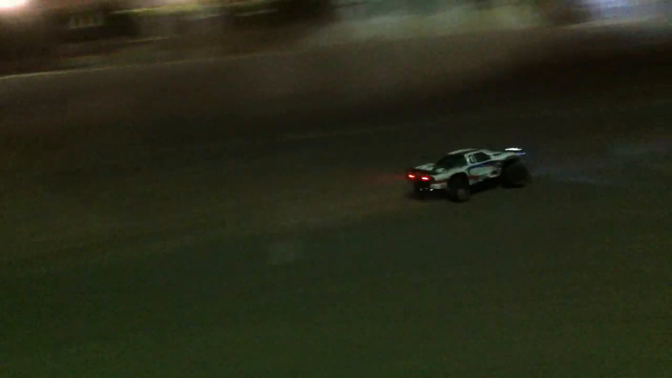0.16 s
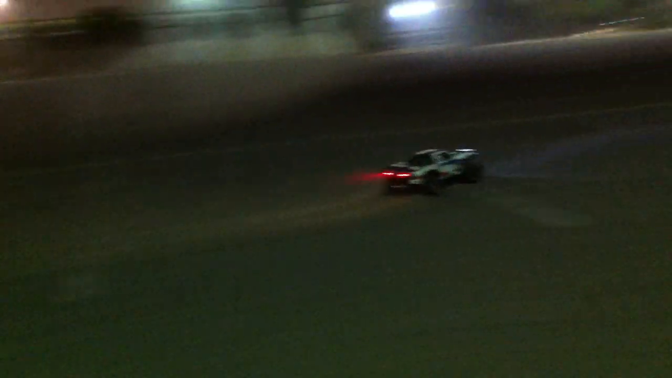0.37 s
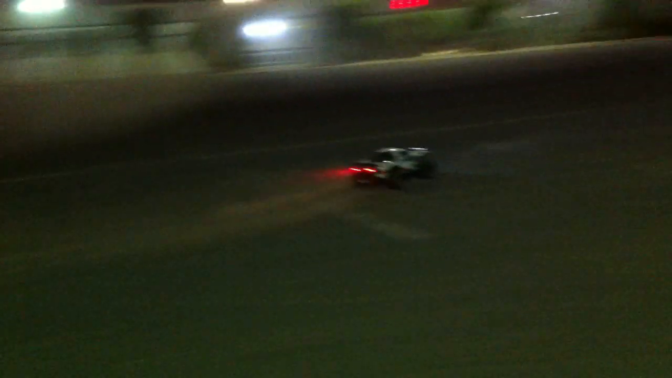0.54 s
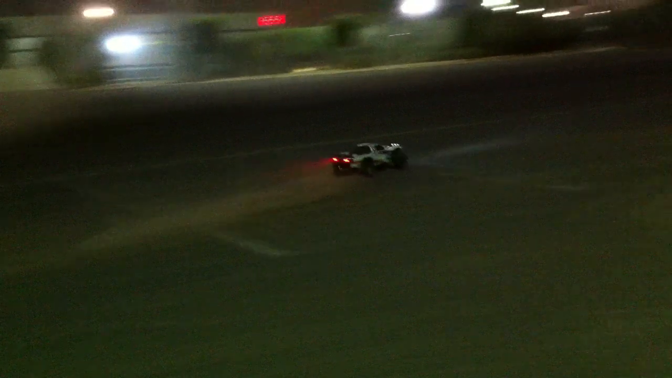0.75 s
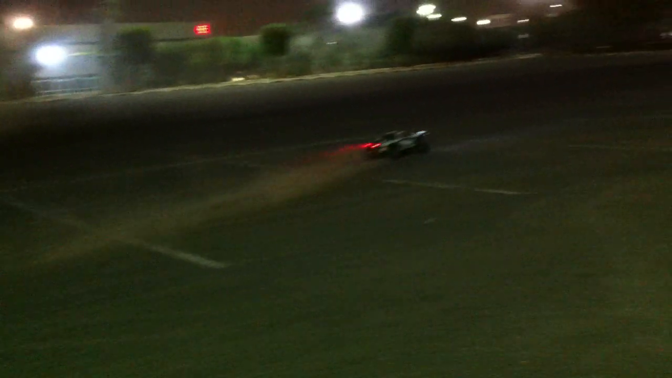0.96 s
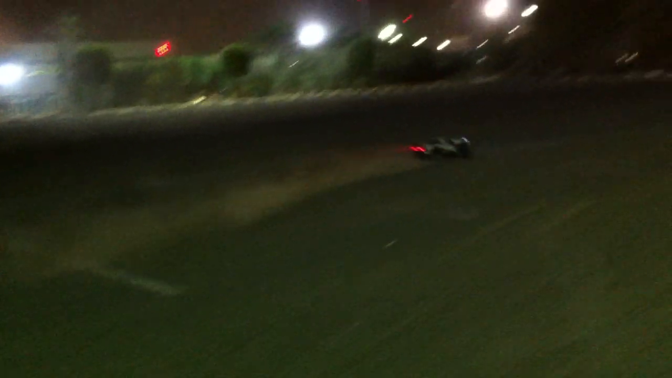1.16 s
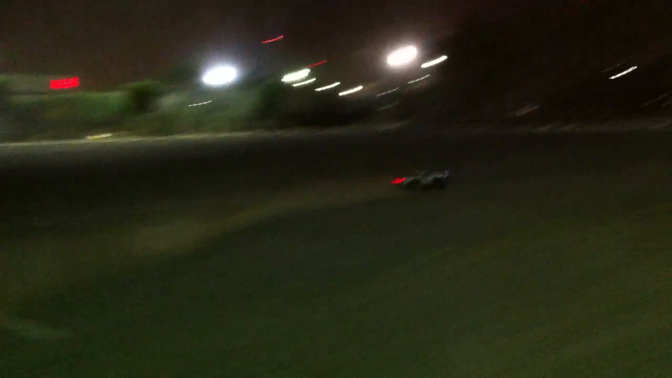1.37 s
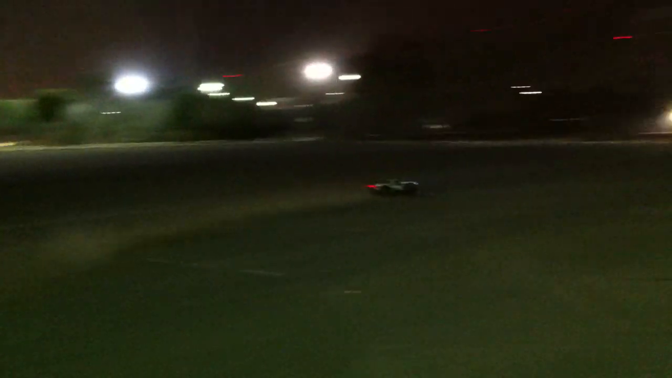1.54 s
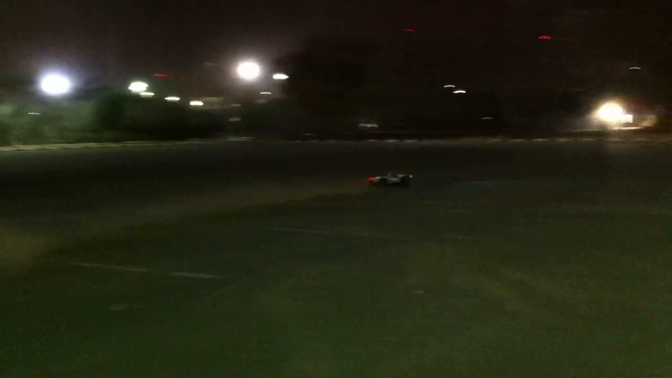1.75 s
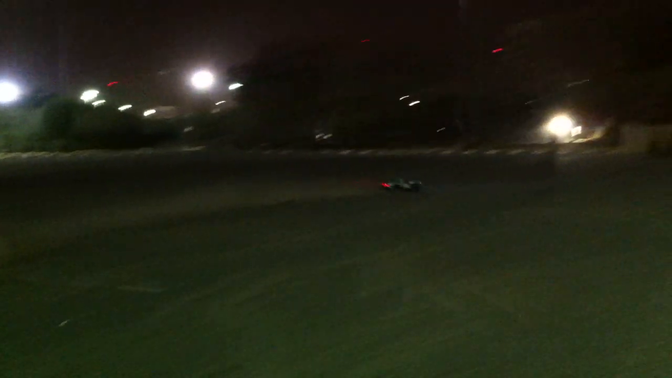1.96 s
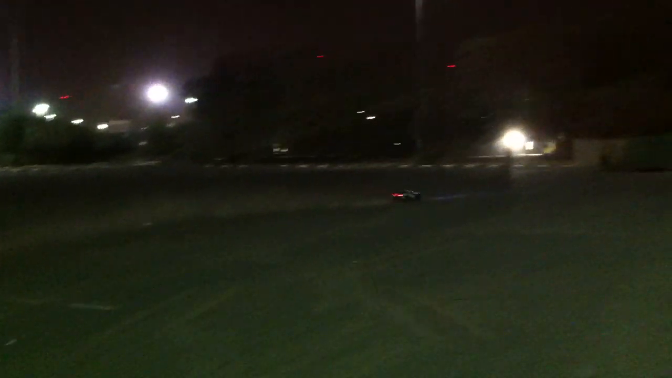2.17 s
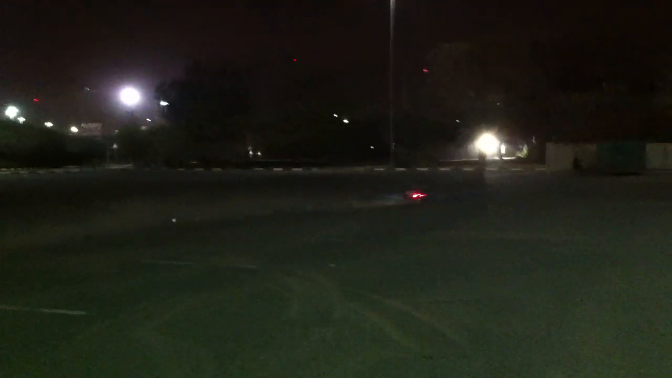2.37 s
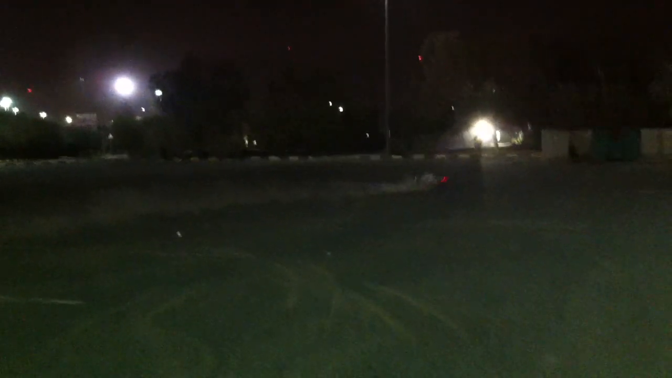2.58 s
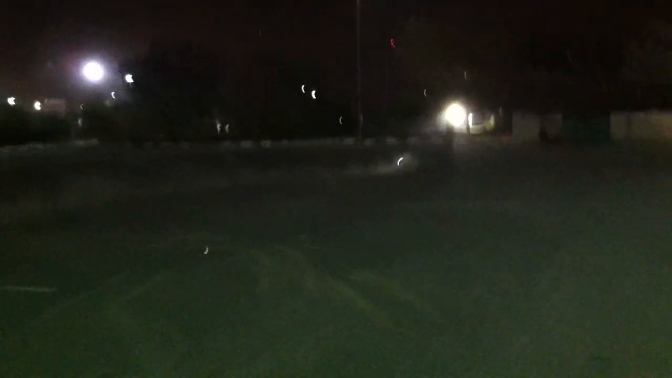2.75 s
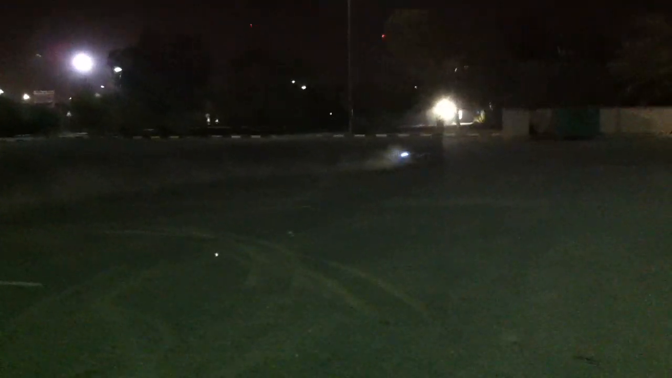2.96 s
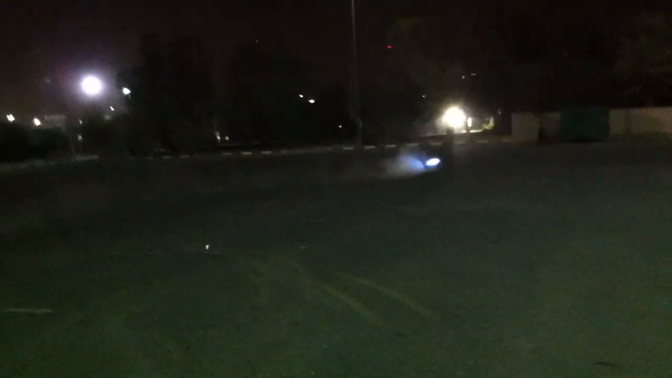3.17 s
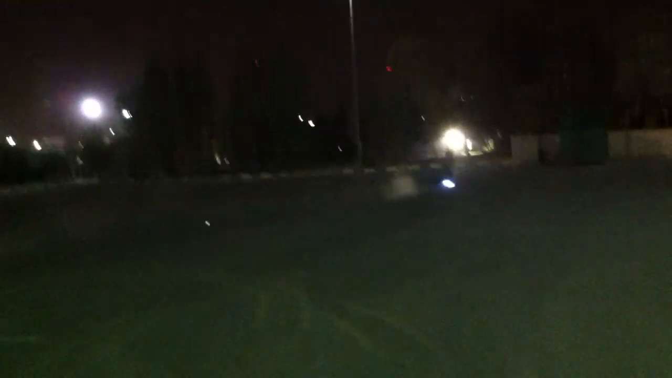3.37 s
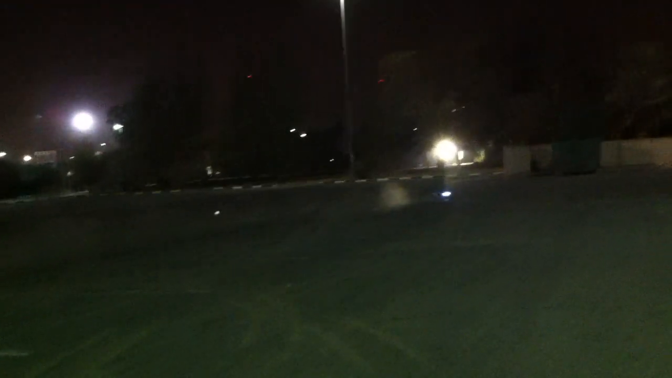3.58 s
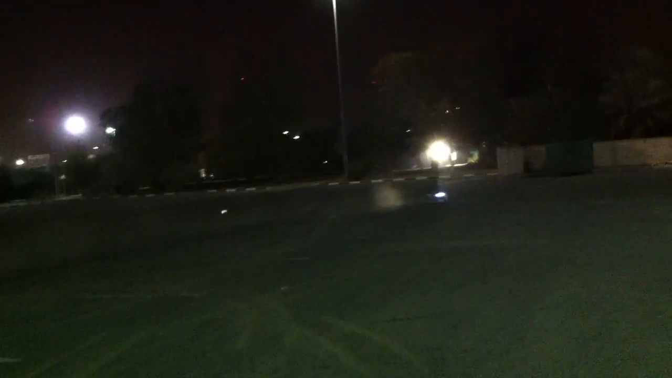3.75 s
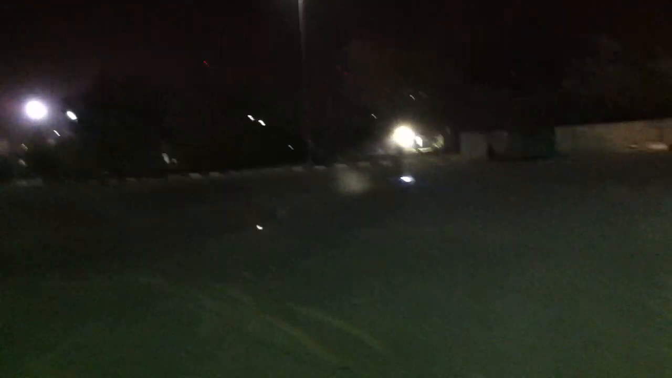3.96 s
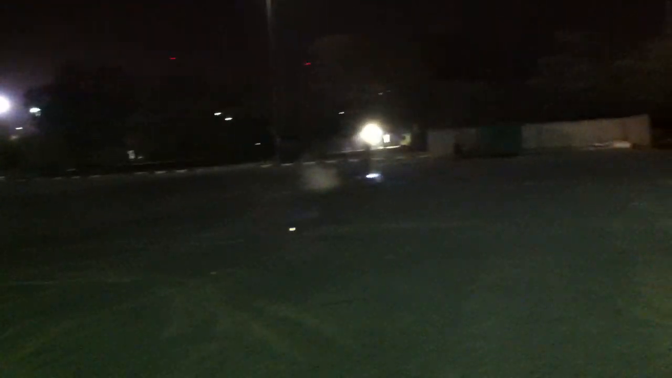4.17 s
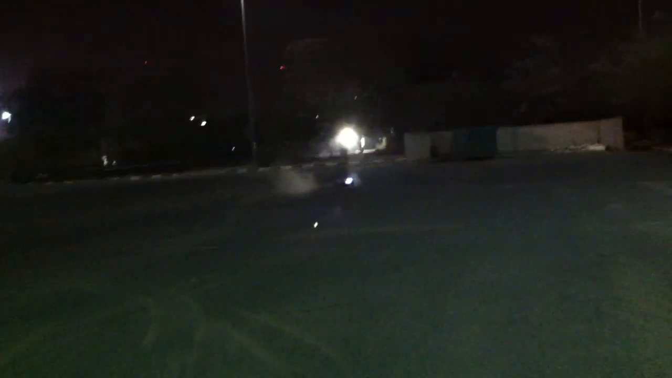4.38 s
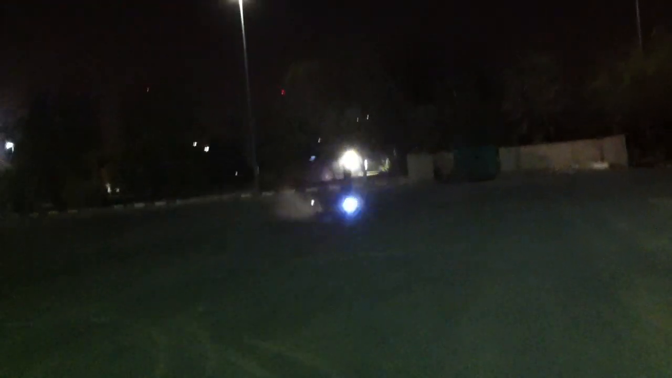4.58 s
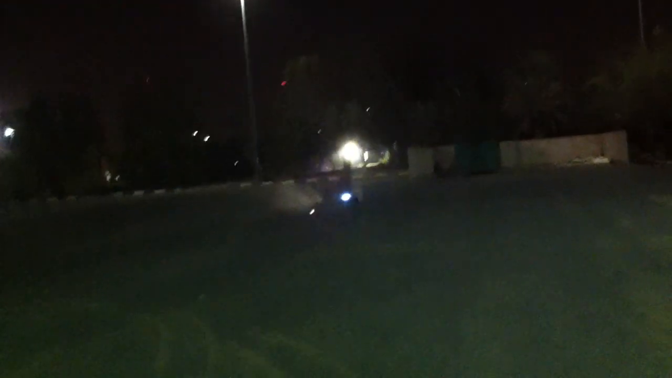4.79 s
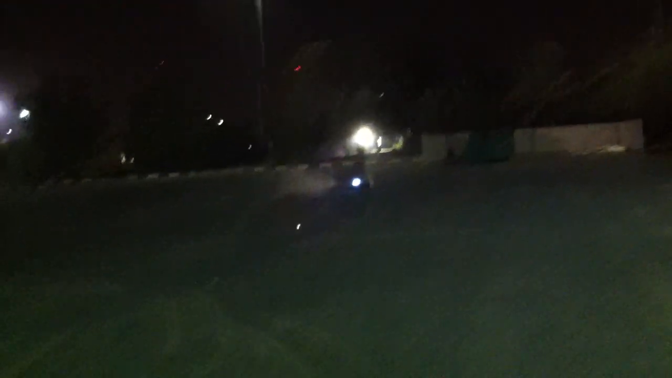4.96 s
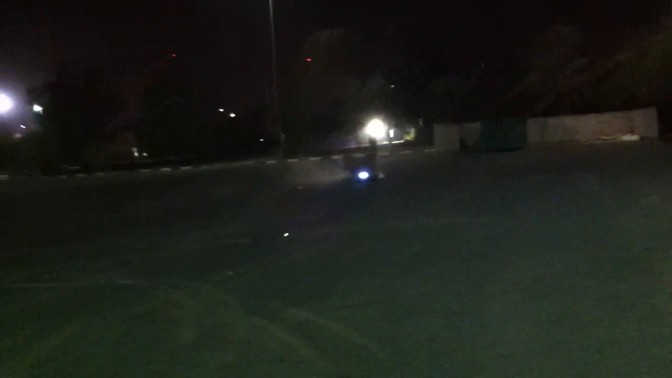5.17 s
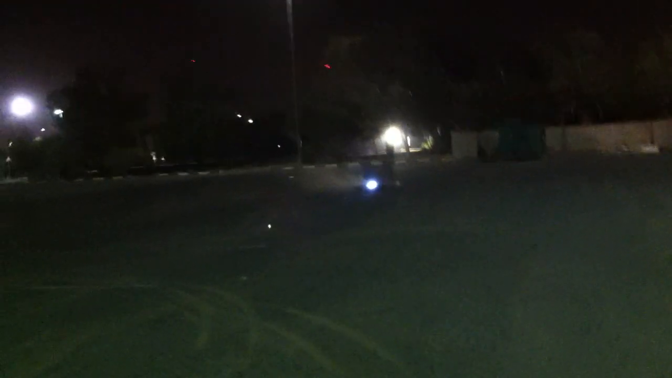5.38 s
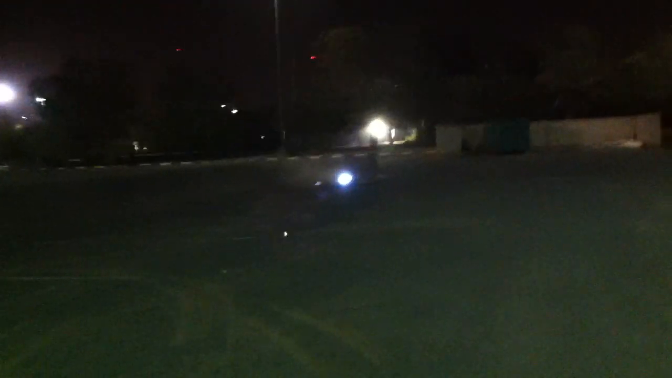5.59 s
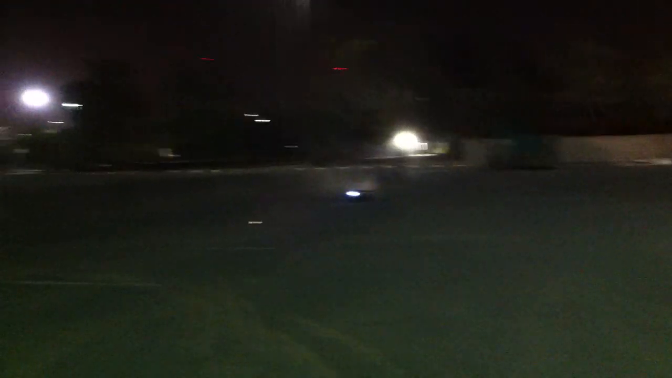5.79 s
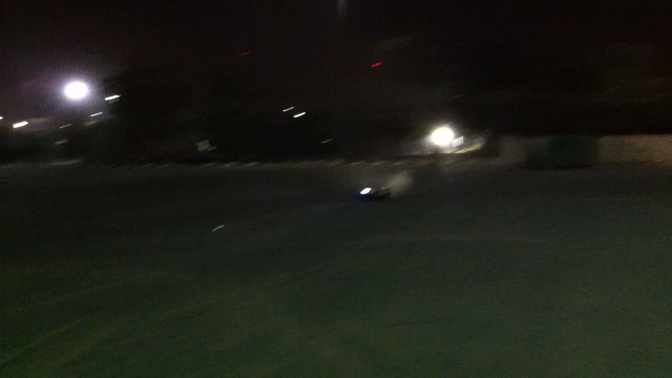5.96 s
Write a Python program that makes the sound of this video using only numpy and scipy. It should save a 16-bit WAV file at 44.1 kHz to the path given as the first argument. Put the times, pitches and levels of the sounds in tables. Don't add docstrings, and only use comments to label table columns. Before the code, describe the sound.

Outdoors at night on open asphalt, a tiny single-cylinder two-stroke car pulls away close to the microphone with a loud, raspy, rising buzz. It dips briefly, screams at full speed, then coasts down to a faint, rough putter far off. Small ticks and a few knocks of grit stand out before two short revs and a climbing return, over low town hum.

```python
import sys
import numpy as np
from scipy import signal
from scipy.fft import rfft, irfft
from scipy.io import wavfile
from scipy.ndimage import uniform_filter1d

SR = 44100
rng = np.random.default_rng(int(sys.argv[2]) if len(sys.argv) > 2 else 0)


def invert_db(x):
    u = np.asarray(x, float) / 20
    return 10 ** u


def to_wav(sig):
    pcm = np.clip(np.atleast_2d(sig), -1, 1) * 32767
    pcm = np.round(pcm).astype(np.int16)
    wavfile.write(sys.argv[1], SR, pcm.T)


N = 265923

# open in s, shut in s, opening time in s, extra hiss in dB.
PULLS = [
    (-.1, 0.606, .02, 0.55),
    (0.683, 1.603, 0.0066, -0.76),
    (4.072, 4.533, 0.082, 4),
    (4.677, 4.797, 0.0062, 2),
    (5.036, 6.203, 0.052, -0.5),
]


def read(points, hz):
    f, value = np.transpose(points)
    return np.interp(np.log(hz + 1), np.log(f + 1), value)


def curves(rows):
    s, *columns = np.transpose(rows)
    return [np.interp(np.arange(N) / SR, s, c) for c in columns]


def by_view(rows, view):
    sides, *columns = np.transpose(rows)
    return [np.interp(view, sides, c) for c in columns]


def steady(x, size=2000):
    power = uniform_filter1d(uniform_filter1d(x ** 2, size), size)
    return x / np.sqrt(abs(power) + 1e-20)


def coloured(x, db):
    log_gain = np.log(invert_db(np.maximum(np.r_[db, db[-2:0:-1]], -100)))
    phase = -signal.hilbert(log_gain).imag
    taps = np.fft.ifft(np.exp(log_gain + 1j * phase)).real
    return signal.oaconvolve(x, taps[:2048])[:N]


def night():
    # frequency in Hz, level in dB.
    town = [(15, -51), (25, -35.5), (141, 7), (461, 3), (691, 6), (905, 2.5), (1040, 8), (1550, 1),
            (2520, -2.5), (2970, -7.5), (15800, -50.5)]
    town_db = -44.5
    hum_hz, hum_width_hz, hum_db = 122.6, 12, -60
    hz = np.fft.rfftfreq(N, 1 / SR)
    wash = irfft(rfft(rng.standard_normal(N)) * invert_db(read(town, hz)), N)
    resonance = 1 / (1 + (2 * (hz - hum_hz) / hum_width_hz) ** 2)
    hum = irfft(rfft(rng.standard_normal(N)) * resonance, N)
    return invert_db(town_db) * wash / wash.std() + invert_db(hum_db) * hum / hum.std()


def bumps(length_s=0.0095):
    # start in s, peak in dB.
    pushes = [(.02, -54), (.18, -56), (.33, -55), (.62, -57), (.7, -44), (1, -60), (1.63, -55), (4.13, -56),
              (4.2, -56), (4.68, -58), (5.08, -60), (6.01, -52)]
    out, t = np.zeros(N), np.arange(3000) / SR / length_s
    for s, db in pushes:
        part = out[round(s * SR):][:3000]
        push = invert_db(db) * 4 * t * (1 - t / 2) * np.exp(-t)
        part += push[:len(part)]
    return out


def grit(length_s=0.00049):
    # start in s, peak in dB, ring in Hz.
    knocks = [
        (3.0974, -32, 1980),
        (3.2568, -34, 2010),
        (3.3044, -34, 1960),
        (3.3304, -25.5, 1964),
        (3.3813, -15, 1920),
        (4.6812, -41, 2330),
    ]
    out, t = np.zeros(N), np.arange(300) / SR
    for s, db, hz in knocks:
        envelope = np.exp(-((t - 2.3 * length_s) / length_s) ** 2)
        out[round(s * SR):][:300] += invert_db(db) * envelope * np.cos(2 * np.pi * hz * (t - 2.05 * length_s))
    return out


def ticks(decay_s=0.001, low_hz=2500, top_hz=8000, lift_db=3):
    # start in s, peak in dB.
    tick_times = [(0.684, -20), (2.0587, -36), (2.0979, -40), (2.1538, -37), (2.3244, -48), (2.4105, -38),
                  (2.581, -51), (2.604, -40), (2.6738, -36), (2.7023, -38), (2.7839, -45), (2.9714, -57),
                  (3.1021, -51), (3.2563, -49), (3.3042, -47), (3.3704, -50), (3.3819, -37),
                  (3.4095, -42.5), (3.4436, -50), (3.5284, -56), (3.5404, -61.5), (3.5688, -47),
                  (3.6117, -54.5), (3.6584, -53), (3.7866, -50), (3.7964, -51.5), (3.8906, -49),
                  (3.9218, -51)]
    out, t = np.zeros(N), np.arange(300) / SR
    snaps = rng.standard_normal((40, 300)) * np.exp(-t / decay_s)
    snaps = signal.lfilter(*signal.butter(1, (low_hz, top_hz), "band", fs=SR), snaps)
    for (s, db), snap in zip(tick_times, snaps):
        out[round(s * SR):][:300] += invert_db(db + lift_db) * snap / abs(snap).max()
    return out


def walls(x, level_db=-20.5, delay_s=.06):
    # frequency in Hz, 60 dB decay time in s.
    decay = [(150, 0.49), (1000, 1), (4000, 0.99), (12000, 0.022)]
    taps = np.zeros(SR)
    at = np.arange(0, SR - 20, 20)
    taps[at + rng.integers(0, 20, len(at))] = rng.choice([-1., 1.], len(at))
    hz, t, z = signal.stft(taps, SR, nperseg=256)
    tail = signal.istft(z * invert_db(-60 * t / read(decay, hz)[:, None]), SR, nperseg=256)[1]
    tail = np.r_[np.zeros(int(delay_s * SR)), tail / np.linalg.norm(tail)]
    return invert_db(level_db) * signal.fftconvolve(x, tail)[:N]


def speed():
    # start in s, length in s, goal in Hz, bend (under 1 starts quickly).
    revs = [(-0.071, 0.168, 159.9, 0.63), (0.095, 0.477, 234.4, 1.01), (0.594, 0.1, 196.0, 1.1),
            (0.705, 0.278, 240.3, 0.7), (0.969, 0.35, 243.0, 1.99), (1.617, 0.31, 164.5, 0.53),
            (1.785, 0.526, 128.4, 0.76), (2.417, 0.875, 81.9, 0.61), (3.558, 0.2, 86.6, 1.35),
            (3.977, 0.204, 80.4, 0.84), (4.1, 0.275, 161.2, 0.55), (4.495, 0.166, 125.9, 1.08),
            (4.671, 0.103, 157.4, 0.68), (4.817, 0.37, 113.2, 0.38), (5.058, 0.129, 158.4, 0.5),
            (5.292, 0.061, 161.5, 1.47), (5.307, 0.377, 193.9, 0.72), (5.478, 0.29, 241.3, 0.8),
            (5.77, 0.33, 248, 0.8)]
    first_hz = 110
    hop_start_s, hop_end_s, hops_per_s, swing_hz, crest_s = 1.0, 1.62, 5.4, 2.3, 1.225
    t = np.arange(0, N + 50, 50) / SR
    goals = [first_hz] + [row[2] for row in revs]
    hz = np.full(len(t), float(first_hz))
    for (s, length, _, bend), step in zip(revs, np.diff(goals)):
        way = np.clip((t - s) / length, 0, 1) ** bend
        hz += step * np.sin(np.pi / 2 * way) ** 2
    hopping = np.clip(10 * np.minimum(t - hop_start_s, hop_end_s - t), 0, 1)
    hz += swing_hz * hopping * np.cos(2 * np.pi * hops_per_s * (t - crest_s))
    return np.interp(np.arange(N) / SR, t, hz)


def whine(waver_db=2.):
    # start in s, end in s, order of the crank speed, level in dB.
    orders = [(2.1, 2.6, 8, -44), (2.1, 2.78, 10, -41), (2.05, 2.55, 14, -43), (1.9, 2.65, 16, -43),
              (1.7, 2.45, 18, -45), (2.1, 2.5, 21, -46), (2.8, 3.4, 7, -53), (3.6, 4.12, 15, -45),
              (3.4, 4.1, 12, -53), (3.5, 4.1, 8, -57), (3.5, 4.1, 25, -57), (3.4, 3.9, 20, -58),
              (4.84, 5.06, 10, -51), (2.5, 2.85, 11, -46), (2.62, 2.85, 12, -48), (2.4, 2.7, 17, -49),
              (3.42, 3.75, 13, -55), (4.08, 4.27, 2, -46), (4.15, 4.56, 1, -50), (3.5, 4.1, 29, -56),
              (2.1, 2.5, 20, -50), (2.0, 2.5, 13, -48), (1.95, 2.5, 15, -50), (1.72, 2.0, 8, -44),
              (1.95, 2.17, 7, -48), (1.9, 2.15, 12, -47)]
    turns, t = np.cumsum(speed()) / SR, np.arange(N) / SR
    out = np.zeros(N)
    for start, end, order, db in orders:
        fade = np.sin(np.pi * np.clip((t - start) / (end - start), 0, 1)) ** .5
        waver = np.interp(t, np.linspace(0, t[-1], 90), rng.standard_normal(90))
        tone = np.sin(2 * np.pi * (round(order) * turns + rng.random()))
        out += invert_db(db + waver_db * waver) * fade * tone
    return out


def buzz():
    start_s, full_s, low_hz, high_hz, level_db = 5.5, 6, 1050, 2098, -31
    shaking = 1.2 + np.cos(2 * np.pi * np.cumsum(speed()) / SR)
    band = signal.butter(2, (low_hz, high_hz), "band", fs=SR, output="sos")
    rattle = signal.sosfilt(band, shaking * rng.standard_normal(N))
    rise = np.clip((np.arange(N) / SR - start_s) / (full_s - start_s), 0, 1)
    return invert_db(level_db) * rise * rattle / rattle.std()


def throttle(shutting_s=0.04):
    t = np.arange(N) / SR
    pulls = [np.minimum((t - a) / rise, 1 + (b - t) / shutting_s) for a, b, rise, _ in PULLS]
    return np.clip(pulls, 0, 1)


def controls():
    # time in s, pipe ring in dB,
    # view (-1 passing, 0 tail, 1 far side, 2 idle, 3 front quarter, 4 nose).
    rolling = [(.65, -34, 0.47), (1.64, -30, 1.12), (1.75, -33.5, 1), (2, -38.5, 1.04), (2.42, -41.5, 0.87),
               (2.65, -42.5, 1.53), (2.9, -44.5, 1.84), (3.45, -49, 1.89), (3.9, -54, 2.05),
               (4.07, -50.5, 1.92), (4.6, -40.5, 2.42), (4.84, -36, 2.32), (4.96, -50, 2.46),
               (5.04, -41.5, 2.18)]
    pulling = [(0, -20.5, -1.5), (.06, -24, -1), (.25, -23.5, -1), (.55, -20.5, 0.18), (.7, -22, 0),
               (.85, -21, -0.5), (1.1, -20, 0), (1.6, -21, 0), (4.1, -38.5, 3), (4.33, -27.5, 3),
               (4.54, -28.5, 3), (4.69, -32, 3), (4.75, -27.5, 3), (4.82, -32, 3.5), (5.06, -30.5, 3.5),
               (5.18, -25.5, 3), (5.45, -26.5, 3.5), (5.7, -23, 4)]
    # view, then thump, crack and hiss in dB from the ring.
    shut_balance = [(.5, -7, -8.5, -41), (1, -12, -14.5, -16), (1.8, -3.5, -6, -18.5), (2, -6, -14.5, -27),
                    (2.3, -14, -6, -30), (2.5, -3, 0, -17)]
    open_balance = [(-1, -8.5, -9, 0), (0.33, -12, -15, -1), (0, -10, -8.5, -2.5), (2.5, 1, -8.5, -22.5),
                    (3, -9, -7.5, -18), (3.5, -10, -6, -15), (4.5, -8.5, -7, -14.5)]
    shut_burn = [(.5, .5, .5, 2), (1, .26, .14, 16), (1.8, .7, .45, 5.5), (2, .8, .33, 3.5),
                 (2.4, .4, .45, 4)]
    open_burn = [(-1, .18, .21, .6), (-.6, .13, .15, .7), (0, .16, .155, 1), (2.5, .3, .2, 3),
                 (2.8, .13, .14, 1), (3, .1, .13, 1), (4, .24, .3, .5)]
    sputter_share, sputter_s = .3, .2
    states = []
    for path, balance, burn in ((rolling, shut_balance, shut_burn), (pulling, open_balance, open_burn)):
        ring_db, view = curves(path)
        states.append(np.array([ring_db, view, *by_view(balance, view), *by_view(burn, view)]))
    pulls = throttle()
    opening = pulls.sum(0)
    blend = states[0] + opening * (states[1] - states[0])
    ring_db, view, thump_db, crack_db, hiss_db, uneven, calm, bass_lift = blend
    hiss_db = hiss_db + np.transpose(PULLS)[3] @ pulls
    fading = np.exp(-1 / (sputter_s * SR))
    lately_open = signal.lfilter([1 - fading], [1, -fading], opening)
    noisy = calm + sputter_share * np.maximum(lately_open - opening, 0)
    bass_lift = 1 + (bass_lift - 1) * calm / noisy
    return ring_db, view, thump_db, crack_db, hiss_db, uneven, noisy, bass_lift


def firings(hz, uneven, jitter=0.02):
    spread_db, puff_s, steady_hiss = 6., .0012, .6
    misfire_start_s, misfire_end_s, misfire_db = 4.07, 4.16, -9
    turns = np.cumsum(hz) / SR + .72
    count = np.arange(1, int(turns[-1]))
    late, strong = rng.standard_normal((2000, 2))[:len(count)].T
    at = np.interp(count, turns, np.arange(N))
    each = at.astype(int)
    hunting = .012 * uniform_filter1d(late, 4)
    at = at + (jitter * uneven[each] * late + hunting) * SR / hz[each] + 20
    missed = (count % 2 == 0) & (each > misfire_start_s * SR) & (each < misfire_end_s * SR)
    size = invert_db(spread_db * uneven[each] * strong + misfire_db * missed)
    near = at.astype(int)[:, None] + np.arange(-16, 17)
    blasts = np.zeros(N + 200)
    np.add.at(blasts, near, size[:, None] * np.sinc(near - at[:, None]) * np.hanning(33))
    starts = np.bincount(at.astype(int), size, N + 200)[:N]
    puffs = signal.lfilter([1], [1, -np.exp(-1 / (puff_s * SR))], starts)
    return steady(blasts[:N]), steady((steady_hiss + puffs) * rng.standard_normal(N))


def bounced(x, shares=(-.8, .9, -.7), wander_ms=0.045, dull_hz=8500):
    # time in s, three delays in ms, strength 0-1.
    bounces = [(0, 0.49, 1.536, 2.93, 0.3), (.5, 0.54, 1.294, 2.76, 0.7), (1, 0.62, 1.525, 2.27, 0.7),
               (1.3, 0.57, 1.44, 2.96, 0.72), (1.6, 0.58, 1.655, 2.2, 0.56), (2.4, 0.48, 1.244, 3, 0.37),
               (4.1, 0.67, 1.554, 2.32, 0.54), (4.5, 0.59, 1.41, 2.7, 0.36), (5.1, 0.66, 1.49, 1.75, 0.34),
               (5.6, 0.62, 1.56, 2.46, 0.091), (6.03, 0.5, 1.38, 2.46, 0.23)]
    *delays_ms, strength = curves(bounces)
    n = np.arange(N)
    knots = np.arange(0, N + 2000, 2000)
    shake = steady(np.interp(n, knots, rng.standard_normal(len(knots))), 40000)
    dull = signal.lfilter(*signal.butter(1, dull_hz, fs=SR), x)
    late = np.zeros(N)
    for share, ms in zip(shares, delays_ms):
        late += share * np.interp(n - (ms + wander_ms * shake) * SR / 1000, n, dull, left=0)
    return x + strength * late


def scattered(x, delays_ms, feedback=.62):
    for ms in delays_ms:
        loop = np.r_[1, np.zeros(int(ms * SR / 1000)), -feedback]
        x = signal.lfilter(-loop[::-1], loop, x)
    return x


def radiated(drive, view):
    # frequency in Hz, level in dB.
    passing = [(76, -63), (130, -15), (172, -3.5), (211, -10), (247, -17), (327, 4.5), (489, -7.5),
               (598, -15.5), (1180, -4.5), (1260, -5.5), (1810, -2), (2640, 4.5), (3170, -1), (9560, -5.5),
               (15800, -15)]
    tail = [(76, -57), (130, 10), (257, 19), (470, 1.5), (731, -4.5), (969, -3), (1230, 0.5), (1670, -2.5),
            (2700, 1.5), (3170, -2), (4030, -9.5), (5910, -16.5), (7080, -16), (10200, -16), (15800, -22.5)]
    far = [(76, -67), (130, -33.5), (252, -2.5), (285, -1), (610, -9), (825, -11), (1010, -12.5),
           (1280, -7.5), (1360, -12.5), (2250, 5), (2750, -7), (3800, -18.5), (11700, -33.5),
           (15800, -35.5)]
    idle = [(76, -19), (130, 2), (434, -2), (461, -2.5), (575, -2.5), (912, -20), (1340, -7.5), (1540, -49),
            (1670, -9), (1810, -10), (2200, -12.5), (2540, -10), (2980, -24.5), (15800, -81)]
    quarter = [(76, -40), (130, -11), (308, 17), (610, -3.5), (825, 4.5), (1070, -1), (1310, 7), (1600, 1),
               (2080, -2.5), (2590, 3), (3300, -15.5), (4460, -18.5), (6150, -29.5), (11200, -34),
               (15800, -49.5)]
    nose = [(76, 43), (130, 16), (228, 15), (470, 16.5), (731, 4.5), (988, 9), (1050, -2), (1260, 1),
            (1920, 0.5), (2920, 1.5), (3370, -5.5), (4550, -10), (6270, -20), (10400, -26), (15800, -44)]
    # frequency in Hz, width in Hz, lift in dB.
    pipe = [(1258, 38, 6), (2534, 100, 4), (734, 360, 4.5), (4000, 1100, 1), (3040, 1500, -2.5),
            (1590, 1800, 1)]
    scatter_ms = (.37, .83, 1.31, 2.1, 2.65)
    loops = [
        (0, 4, .62),
        (0, 2, .62),
        (4, 5, .78),
        (0, 4, .62),
    ]
    hz = np.fft.rfftfreq(4096, 1 / SR)
    pipe_db = sum(db / (1 + (2 * (hz - f) / width) ** 2) for f, width, db in pipe)
    outlet = scattered(drive, (.14,))
    sides = [coloured(outlet, read(colour, hz) + pipe_db) for colour in (passing, tail)]
    for colour, (first, end, feedback) in zip((far, idle, quarter, nose), loops):
        smeared = scattered(drive, scatter_ms[first:end], feedback)
        sides.append(coloured(smeared, read(colour, hz) + pipe_db))
    return sum(np.clip(1 - abs(view - k), 0, 1) * steady(side) for k, side in enumerate(sides, -1))


def shimmer(x, width_hz=130):
    # start in s, end in s, from Hz, to Hz, lift in dB.
    gliding_bands = [(-0.12, 0.21, 4100, 3570, 6), (-0.26, .12, 2400, 2150, 11), (0.069, .5, 7200, 8000, 9),
                     (-0.19, 0.44, 7160, 6760, -13.5), (-0.083, 0.82, 5600, 5850, 7.5),
                     (0.19, 0.72, 3860, 3600, -7), (0.28, .7, 4360, 4500, -15), (0.38, 0.75, 2740, 2540, 10),
                     (.42, 0.57, 2300, 2350, 2), (0.18, .95, 6500, 7060, 3.5), (-0.19, 0.95, 4600, 2900, 7),
                     (.6, 1.2, 8400, 8300, -14), (1.2, 1.8, 2590, 3000, 1), (0.88, 1.1, 1900, 3400, -3),
                     (0.98, 1.35, 4100, 4900, -5), (1.3, 1.9, 7650, 7750, -10), (1.26, 1.73, 4240, 4330, 11),
                     (0.41, .1, 6800, 6720, 6.5), (-0.023, 0.15, 1160, 1280, 7),
                     (0.09, 0.44, 1200, 1370, -7.5), (0.38, 0.35, 3900, 4150, -12),
                     (.27, 0.53, 7600, 7900, 4.5), (0.034, 0.57, 7600, 8600, -9.5),
                     (0.65, 1.5, 6200, 4200, -10.5), (.75, 0.93, 8000, 7800, -17), (0.81, 1.4, 4570, 5000, 7),
                     (1.13, 1.6, 8300, 10000, -5.5), (0.93, 1.9, 12000, 9200, -10),
                     (0.57, 1.86, 2900, 2100, 6), (1.16, 1.59, 3400, 3120, 8), (1.33, 1.7, 3900, 3620, 8),
                     (1.47, 1.8, 2770, 2650, 7.5), (-0.22, 0.54, 11000, 10000, -16),
                     (.35, 1.2, 16000, 10000, -13.5),
                     (2.45, 2.73, 2340, 2400, -12), (4.8, 5.03, 3700, 3630, 8), (5.13, 5.6, 3100, 3250, -3),
                  (4.4, 3.9, 1500, 1900, -9), (4.9, 4.27, 2300, 2250, 11), (5.26, 4.76, 560, 950, 4.5),
                  (3.7, 6, 1980, 2260, -4), (5.75, 7.5, 6800, 6700, -6), (1.8, 2.1, 2630, 2660, -7),
                  (1.8, 2.4, 1200, 1600, -13), (2.02, 2.65, 860, 800, -17), (2, 3.8, 3500, 3270, 10),
                  (2.5, 4.8, 4400, 4400, -3), (4.68, 4.82, 1100, 1700, 6), (4.7, 4.84, 1800, 2150, 6),
                  (4.25, 4.7, 680, 720, -13), (4.2, 4.56, 4550, 4650, 0), (4.8, 5, 2700, 2800, -14),
                  (4.3, 4.84, 4700, 5000, 13), (4.54, 5.24, 1600, 2100, 8), (5.36, 6, 4260, 4330, 9),
                  (5.1, 5.38, 3700, 3820, 5), (5.1, 5.4, 4100, 4300, 5), (4.26, 4.56, 4500, 4300, 2),
                  (2.45, 2.84, 2200, 2200, -7), (4.7, 4.84, 4300, 4300, 5), (4.66, 4.8, 680, 980, 8),
                  (5.2, 5.7, 8900, 9700, 10), (5.23, 5.9, 5100, 5400, 9), (5.4, 6, 7500, 7700, 10),
                  (5.85, 6.2, 3500, 3400, 3), (5.72, 6, 5200, 5000, -11), (5.18, 5.86, 2320, 2600, 7),
                  (5.2, 6.3, 2900, 2720, 4.5), (5.6, 6, 3300, 3240, -5), (6.5, 5.8, 490, 530, 0),
                  (5.5, 5.7, 1460, 1370, 6.5), (4.08, 4.4, 510, 1200, 2), (4.3, 6, 370, 1770, 2.5),
                  (5.3, 6.8, 1450, 1440, -3.5)]
    hz, t, z = signal.stft(x, SR, nperseg=512, noverlap=384)
    speckle = uniform_filter1d(rng.standard_normal(z.shape[::-1]), 2, 1)
    drift, flutter = uniform_filter1d(speckle, 70, 0), uniform_filter1d(speckle, 18, 0)
    patches = (drift + .4 * flutter).T
    depth_db = read([(500, 1), (3000, 2), (6000, 2.9)], hz)[:, None]
    lift_db = depth_db * patches / patches.std()
    for start, end, from_hz, to_hz, db in gliding_bands:
        way = np.clip((t - start) / (end - start), 0, 1)
        off = (hz[:, None] - from_hz - (to_hz - from_hz) * way) / width_hz
        lift_db = lift_db + db * np.sqrt(abs(np.sin(np.pi * way))) * np.exp(-off ** 2)
    return signal.istft(z * invert_db(lift_db), SR, nperseg=512, noverlap=384)[1][:N]


def engine(surge_db=.9):
    ring_db, view, thump_db, crack_db, hiss_db, uneven, noisy, bass_lift = controls()
    blasts, hiss = firings(speed(), uneven)
    hz = np.fft.rfftfreq(N, 1 / SR)
    turbulence_gain = read([(130, .22), (300, .5), (2500, 1), (5000, 1.9), (10000, 3.6)], hz)
    turbulence = irfft(rfft(hiss) * turbulence_gain, N)
    wash = irfft(rfft(hiss) * .5 / (1 + (hz / 800) ** 4), N)
    drive = bounced(blasts + noisy * (turbulence + (bass_lift - 1) * wash))
    heard = shimmer(radiated(drive, view))
    heard = rfft(heard * signal.windows.tukey(N, .0016))
    below = [1 / (1 + (hz / 125) ** 12)]
    below += [1 / (1 + (hz / edge_hz) ** 6) for edge_hz in (600, 3200, 6500)]
    below += [1]
    ring_db = ring_db + surge_db * np.interp(np.arange(N), np.linspace(0, N, 110), rng.standard_normal(110))
    out = np.zeros(N)
    for k, from_ring_db in enumerate((thump_db, 0, crack_db, hiss_db)):
        band = irfft(heard * (below[k + 1] - below[k]), N)
        out += invert_db(ring_db + from_ring_db) * steady(band)
    return out


def scene():
    car = engine() + whine() + buzz()
    return (car + walls(car) + night() + grit() + ticks() + bumps())[None]


def low_pass(x):
    return signal.sosfilt(signal.butter(12, 15970, fs=SR, output="sos"), x)


def record(dry):
    self_noise_db, ceiling = -70, .8
    noisy = dry + invert_db(self_noise_db) * rng.standard_normal(N)
    heard = signal.lfilter(*signal.butter(2, 40, "high", fs=SR), noisy)
    heard = heard / (1 + (heard / ceiling) ** 4) ** .25
    heard = signal.oaconvolve(heard, signal.firwin(301, 15950, fs=SR)[None], "same")
    return low_pass(heard)


dry = scene()
out = record(dry)
to_wav(out)
```